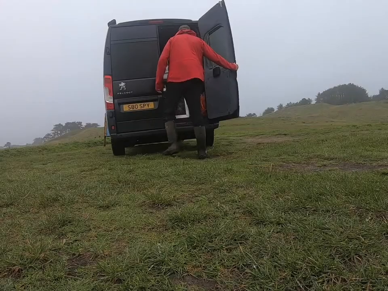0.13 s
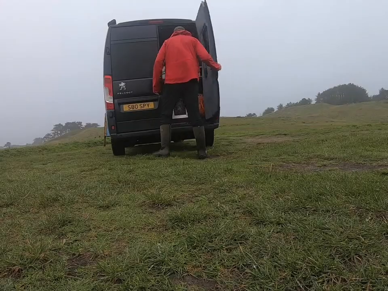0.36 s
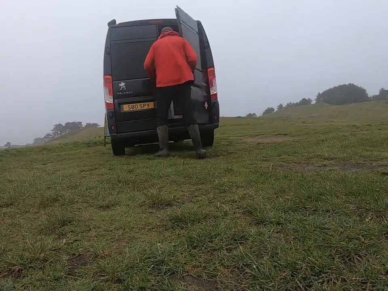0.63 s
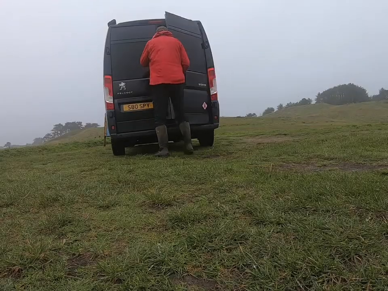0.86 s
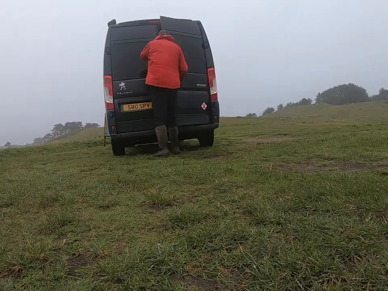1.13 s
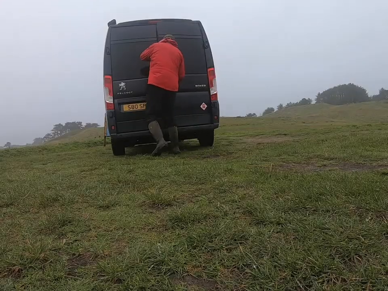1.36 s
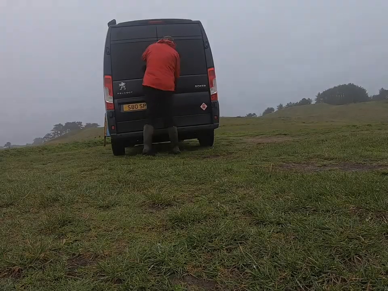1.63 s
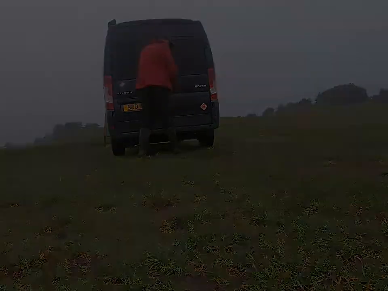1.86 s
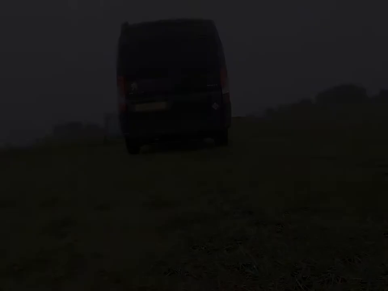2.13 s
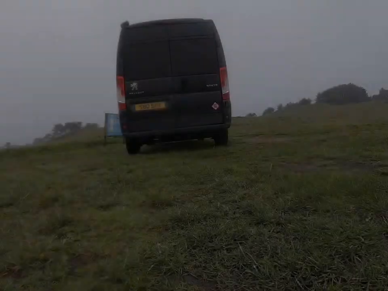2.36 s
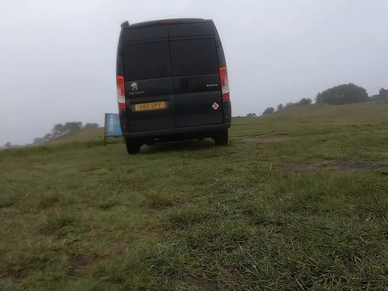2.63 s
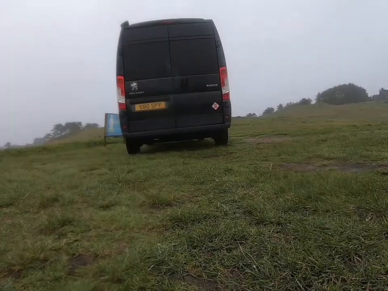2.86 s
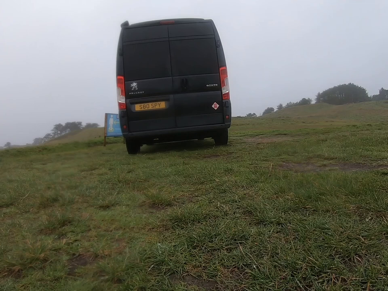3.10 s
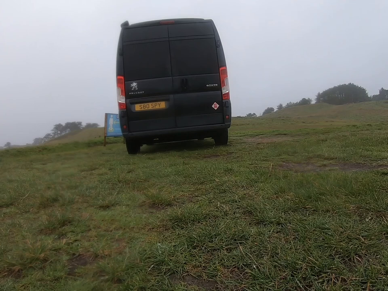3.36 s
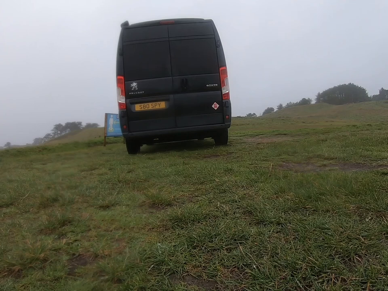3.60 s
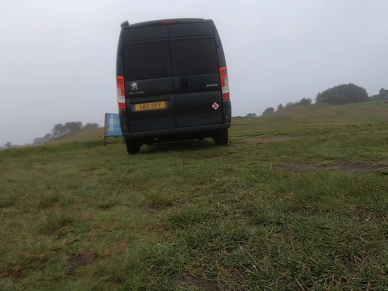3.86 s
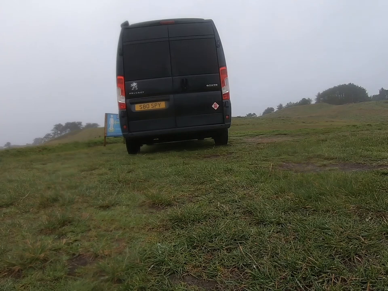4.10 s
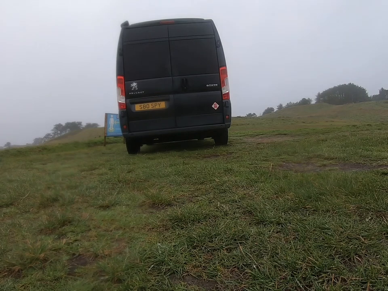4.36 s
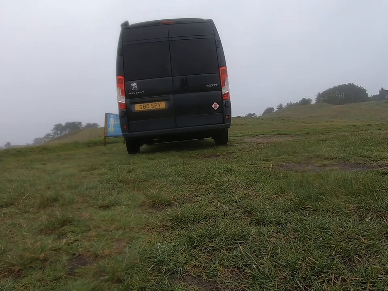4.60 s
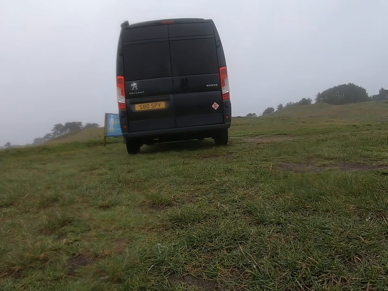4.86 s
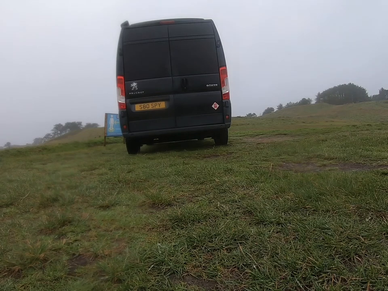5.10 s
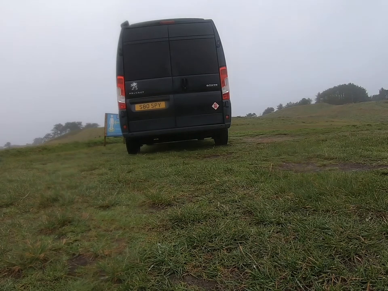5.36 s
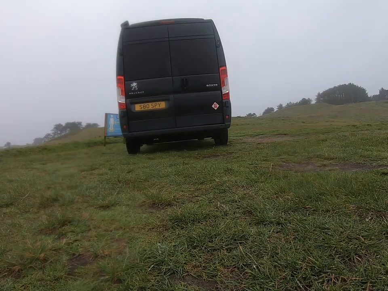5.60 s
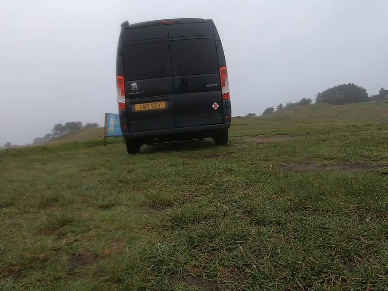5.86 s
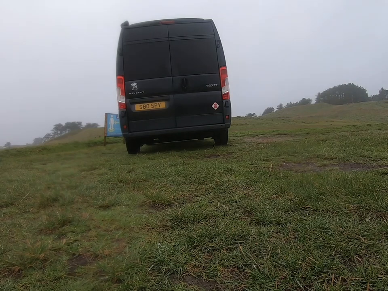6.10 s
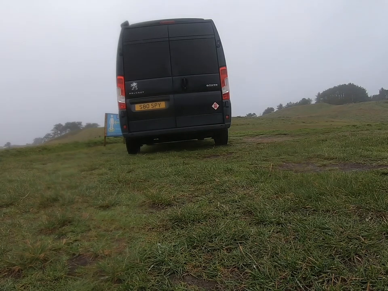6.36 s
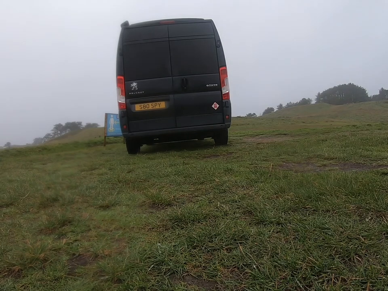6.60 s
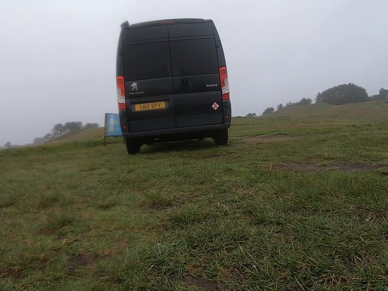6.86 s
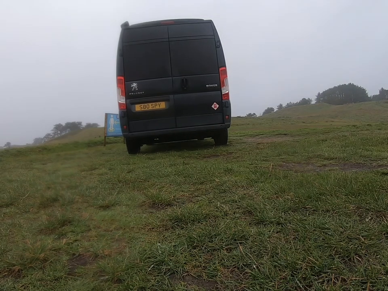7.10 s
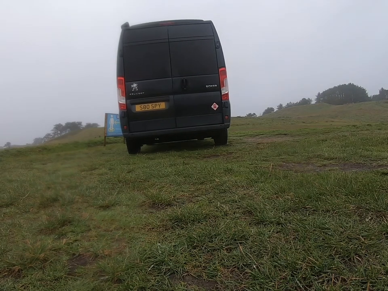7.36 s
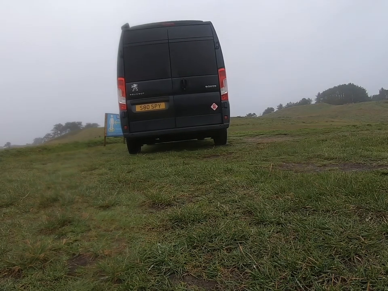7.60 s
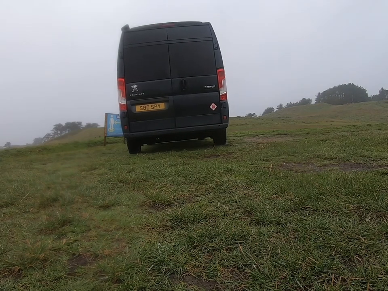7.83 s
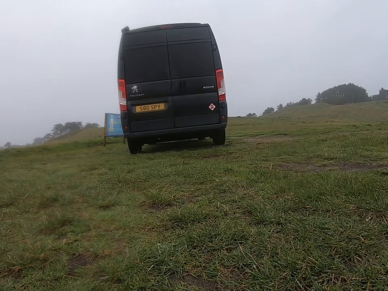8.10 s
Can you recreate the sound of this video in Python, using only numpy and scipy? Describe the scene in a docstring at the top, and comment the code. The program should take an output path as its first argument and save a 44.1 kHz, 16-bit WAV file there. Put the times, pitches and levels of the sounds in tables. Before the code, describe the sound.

A windy, open grassy hillside, heard by a stereo microphone a few metres behind a van. From 0 to 1.4 s there are soft wind puffs, faint cloth and boot rustles, a dull knock near 0.3 and a small click at 1.1. At 1.5 s the rear door slams: a rapid cluster of metallic cracks with a deep body boom, rattling out by about 1.75. Slight rustles follow, then near quiet until gusts grow from 2.9 s, thumping low and strongest around 3.5 to 5.1, a little heavier on the left. Tiny ticks come just before 3.8, when the starter grinds through two quick compressions. The diesel catches around 4.25, flares, and settles to a clattering idle with a short whining hum near 5 s. From 6.65 it revs, nearly doubling in pitch by 7.4, much louder and fuller, and holds steadily to the end at about 8 s.

```python
"""Diesel van on a windy hillside

Someone shuffles behind a van and slams its rear door; later the starter cranks two compressions and
the diesel catches, settles to idle and is revved up. Engine and exhaust follow one count of firings,
the starter is shaped noise with gliding tones, and the door is struck panel modes, cracks and a boom.
Cloth, knocks and drizzle are noise and short rings; gusts buffet two microphone ports over faint air.
"""
import sys
import numpy as np
from scipy import signal
from scipy.fft import irfft
from scipy.io import wavfile
from scipy.ndimage import uniform_filter1d

SR = 44100
rng = np.random.default_rng(int(sys.argv[2]) if len(sys.argv) > 2 else 0)


def level_to_linear(level):
    """Convert decibel levels to linear amplitude factors, elementwise."""
    exponent = np.asarray(level, float) / 20
    return 10 ** exponent


def materialize(psi):
    """Save the field psi as 16-bit PCM at rate SR to the path in sys.argv[1].

    A 1-D psi becomes a single channel; in a 2-D psi each row is a channel.
    """
    bounded = np.clip(np.atleast_2d(psi).T, -1, 1)
    quanta = np.round(bounded * 32767).astype(np.int16)
    wavfile.write(sys.argv[1], SR, quanta)


N = 362502  # length in samples


def evened(x):
    """Scales a signal to rms 1."""
    return x / np.sqrt(np.mean(x ** 2) + 1e-20)


def read(points, hz):
    """Reads a curve at the given frequencies, interpolating over log frequency."""
    f, value = np.transpose(points)
    return np.interp(np.log(hz + 1), np.log(f + 1), value)


def curves(rows):
    """Columns on the sample grid, and a gate that is open while the rows last."""
    s, *columns = np.transpose(rows)
    t = np.arange(N) / SR
    edge_s = np.minimum(t - s[0] + .008, s[-1] + .008 - t)
    gate = np.clip(edge_s * 125, 0, 1)
    return gate, *(np.interp(t, s, c) for c in columns)


def colour(x, points):
    """Filters by a spectrum, causally (minimum phase), so that a pulse rings after it strikes."""
    gain_db = np.maximum(read(points, abs(np.fft.fftfreq(16384, 1 / SR))), -100)
    response = np.exp(np.conj(signal.hilbert(np.log(level_to_linear(gain_db)))))
    taps = irfft(response[:8193])[:8192]
    return signal.oaconvolve(x, taps)[:N]


def noise(points):
    """Noise of rms 1 with the given spectrum."""
    return evened(colour(rng.standard_normal(N), points))


def wander(size):
    """Slow chance of rms 1, smooth over about size samples."""
    coarse = rng.standard_normal(N // 16 + 2)
    coarse = uniform_filter1d(uniform_filter1d(coarse, size // 16), size // 16)
    return np.interp(np.arange(N) / 16, np.arange(len(coarse)), evened(coarse))


def steady(x, size):
    """Evens out the slow level chance of a narrow noise."""
    power = uniform_filter1d(uniform_filter1d(x ** 2, size), size)
    return x / np.sqrt(power + .02)


def held(start, stop, attack_db_per_s, release_db_per_s):
    """dB shape: a straight rise, 0 from start to stop, a straight fall."""
    t = np.arange(N) / SR
    return -attack_db_per_s * np.maximum(start - t, 0) - release_db_per_s * np.maximum(t - stop, 0)


def ring(hz, t60, rise=0.00077546):
    """A decaying mode: a sine that falls 60 dB in t60 seconds after a straight rise in seconds."""
    t = np.arange(round(min(t60 * 0.8, 1) * SR) + 9) / SR
    return level_to_linear(-60 * t / t60) * np.sin(2 * np.pi * hz * t) * np.minimum(t / rise, 1)


def add(mix, s, sound):
    """Lays a sound into the mix, starting at s seconds."""
    part = mix[round(s * SR):][:len(sound)]
    part += sound[:len(part)]


# engine speed: t/s, firing rate f/Hz
ENGINE_SPEED = [(4.2, 24), (4.35, 33), (4.65, 29.2), (5.0, 27.4), (5.2, 26.6), (5.5, 25.6), (5.8, 25.2),
                (6.62, 25.2), (6.75, 29.3), (6.89, 32.9), (6.99, 34.9), (7.19, 43.6), (7.32, 47.1),
                (7.4, 48.6), (7.55, 49), (8.22, 49.4)]
# spectrum of the engine bay: f/Hz, level/dB
ENGINE_BAY = [(120, -17), (250, 2.5), (320, -19), (385, -8.5), (455, -14.5), (535, -10), (690, -13.5),
              (770, -7), (860, -15.5), (980, -19), (1140, -12), (1270, -6), (1390, -15), (1510, -6.5),
              (1640, -15), (1900, -11.5), (2600, -27.5), (3400, -60.5)]
# hiss of injectors and belts: f/Hz, level/dB
INJECTOR_HISS = [(1500, -13.5), (2400, -3.5), (4200, -8), (5300, -13.5), (6100, -10.5), (8000, -31.5),
                 (9800, -12), (11300, -30), (15000, -39)]
# generator hum partials: multiple of the firing rate, level/dB
GENERATOR_HUM = [(7.7, 2), (11.55, 2.5), (15.4, 3.5), (19.25, -6), (23.1, -7.5)]
IDLE_PER_S = 25.494  # firings a second at idle


def engine():
    """Four uneven cylinders puff through the exhaust and knock the block once per firing."""
    gate, rate = curves(ENGINE_SPEED)
    exhaust_db, clatter_db, hum_db = loads(rate)
    firings = np.cumsum(rate * (1 + .002 * wander(size=3000))) / SR
    firings += 400 - firings[round(5.93 * SR)]  # the first cylinder fires at this moment
    cylinder = firings.astype(int) % 4
    fired = np.diff(np.floor(firings), prepend=0.)

    cylinder_gain = level_to_linear(np.array([-6.0, -3.5, -3.0, -6.5])[cylinder])
    knock = 1 + 1.391 * np.exp(-(firings % 1) / 0.6006) * cylinder_gain
    rattle = knock * level_to_linear(1.17 * wander(size=150)) * rng.standard_normal(N)
    # valve gear repeats its taps at every firing
    taps = irfft(np.exp(2j * np.pi * rng.random(301)))
    valve_gear = np.interp(firings * 600, np.arange(600), taps, period=600)
    valve_taps = 0.7 * (rate / 49) ** 1.3 * evened(knock * valve_gear)
    clatter = evened(colour(evened(rattle) + valve_taps, ENGINE_BAY))
    clatter += level_to_linear(-22.5) * evened(colour(rattle, INJECTOR_HISS))

    hum = np.zeros(N)
    for multiple, db in GENERATOR_HUM:
        hum += level_to_linear(db + 3.5 * wander(size=2500)) * np.sin(2 * np.pi * multiple * firings)

    # loose panels, each rung by its own cylinders; the last only above idle speed
    loose = fired * level_to_linear(3.0 * wander(size=2000))
    revved = np.clip(rate / IDLE_PER_S - 1, 0, 1)
    panels = np.zeros(N)
    for struck, db, hz, t60, rise in [(cylinder == 0, -43, 529.43, 0.14892, 0.02831),
                                      (cylinder == 2, -46.5, 754.89, 0.1029, .02),
                                      (cylinder % 2 == 0, -43, 264.61, 0.14282, 0.01374),
                                      ((cylinder == 1) * revved, -34.5, 845, 0.07764, 0.0126)]:
        panels += level_to_linear(db) * signal.oaconvolve(loose * struck, ring(hz, t60, rise))[:N]

    out = level_to_linear(exhaust_db) * exhaust(rate, firings) + level_to_linear(clatter_db) * clatter
    return gate * (out + level_to_linear(hum_db) * hum + panels)


# response of the exhaust pipe: f/Hz, level/dB
EXHAUST_PIPE = [(20, 0.5), (49, -0.5), (97, -7), (146, -16), (197, -3), (246, -8), (296, -23.5),
                (345, -25.5), (440, -32), (540, -21), (640, -40.5), (850, -25.5), (1100, -41.5)]


def exhaust(rate, firings):
    """Firing orders add up to one suction dip per firing; uneven cylinders give weak half orders."""
    out = np.zeros(N)
    at = np.arange(round(ENGINE_SPEED[0][0] * SR), N)
    frames = np.arange(0, N, 512)
    for k in np.arange(1, 20, .5):
        drift, sway = uniform_filter1d(rng.standard_normal((2, len(frames))), 6) * np.sqrt(6)
        level = level_to_linear(read(EXHAUST_PIPE, k * rate[frames]) - 29.534 * (k % 1) + 1.0 * sway)
        phase = 2 * np.pi * k * firings[at] + 0.0385 * k * np.interp(at, frames, drift)
        phase -= 0.077041 * k ** 2  # spreads the dip in time
        out[at] -= np.interp(at, frames, level) * np.cos(phase)
    return out


CATCH_S, THROTTLE_S = 4.3, 6.72  # the engine has swelled in; pedal down
# at idle, growth with speed, change under throttle, swell as the engine catches
EXHAUST_DB, EXHAUST_DB_PER_OCTAVE, EXHAUST_LOAD_DB, EXHAUST_CATCH_DB_PER_S = -52, 19, 1, 200
CLATTER_DB, CLATTER_DB_PER_OCTAVE, CLATTER_LOAD_DB, CLATTER_CATCH_DB_PER_S = -52.5, 10, 4, 67.5
HUM_DB, HUM_FIRING_HZ, HUM_DB_PER_HZ = -53.5, 27.088, 4.5  # loudest at one speed
# charging sets in; the battery is topped up and the hum dies away
CHARGE_S, CHARGED_S, HUM_FADE_DB_PER_S = 4.78, 5.3, 9


def loads(rate):
    """Exhaust, clatter and hum levels in dB from speed and throttle."""
    octaves = np.log2(rate / IDLE_PER_S)
    pedal = np.clip((np.arange(N) / SR - THROTTLE_S) / 0.07574, 0, 1)
    exhaust_db = EXHAUST_DB + EXHAUST_DB_PER_OCTAVE * octaves + EXHAUST_LOAD_DB * pedal
    exhaust_db += held(CATCH_S, 9, EXHAUST_CATCH_DB_PER_S, 0)
    clatter_db = CLATTER_DB + CLATTER_DB_PER_OCTAVE * octaves + CLATTER_LOAD_DB * pedal
    clatter_db += held(CATCH_S, 9, CLATTER_CATCH_DB_PER_S, 0)
    hum_db = HUM_DB - HUM_DB_PER_HZ * abs(rate - HUM_FIRING_HZ)
    hum_db += held(CHARGE_S, CHARGED_S, 70, HUM_FADE_DB_PER_S)
    return exhaust_db, clatter_db, hum_db


# spectra of the pinion grind and of the hiss over it: f/Hz, level/dB
GRIND_SPECTRUM = [(210, -33.5), (350, -11.5), (548, -14), (739, -10.5), (1020, -9.5), (1700, -5.5),
                  (1890, -17.5), (2040, -12), (4500, -43), (9900, -120)]
FIZZ_SPECTRUM = [(1760, -29), (3000, 1.5), (5730, -1.5), (7910, -11.5), (8640, -4), (9810, 2),
                 (11800, -16.5), (13800, -16), (15000, -24.5)]
# gear whine, a rising and falling glide, then a falling one:
# start t/s, stop t/s, top speed t/s, top mesh f/Hz, level/dB
GEAR_WHINE = [(3.9, 4.072, 4.0, 499, -48), (4.148, 4.192, 4.135, 564.4, -50.5)]
# relative heights of the mesh harmonics, from the fundamental up
MESH_HARMONICS = [0.3866, 2.4, 2.0577, .6, .35]
# tones as the engine catches, a thin rising whistle and a rotor coasting down: t/s, f/Hz, level/dB
COASTING_TONES = [
    [(4.21, 4500, -73.5), (4.26, 5095, -74.5), (4.33, 5654, -82)],
    [(4.38, 418.4, -58.5), (4.47, 385.4, -45), (4.6, 343.2, -55.5), (4.75, 318.1, -65)],
]
MESH_SAG_HZ_PER_S2, WHINE_DB_PER_HZ, WHINE_EDGE_DB_PER_S = 10500, 0.1495, 1100


def starter():
    """Pinion grind and hiss load up on each compression, with gliding tones."""
    grind, hiss = efforts()
    out = grind * level_to_linear(2.0 * wander(size=120)) * noise(GRIND_SPECTRUM)
    out += hiss * level_to_linear(1.748 * wander(size=300)) * noise(FIZZ_SPECTRUM)
    for start, stop, top_s, top_hz, top_db in GEAR_WHINE:
        at = slice(round((start - .1) * SR), round((stop + .1) * SR))
        t = np.arange(N)[at] / SR
        hz = np.maximum(top_hz - MESH_SAG_HZ_PER_S2 * (t - top_s) ** 2, 0)
        db = top_db - WHINE_DB_PER_HZ * (top_hz - hz)
        db += held(start, stop, WHINE_EDGE_DB_PER_S, WHINE_EDGE_DB_PER_S)[at]
        phase = 2 * np.pi * np.cumsum(hz * (1 + 0.01514 * wander(size=300)[at])) / SR
        for k, share in enumerate(MESH_HARMONICS, 1):
            out[at] += share * level_to_linear(db + 2.5 * wander(size=800)[at]) * np.sin(k * phase)
    for gate, hz, db in map(curves, COASTING_TONES):
        out += gate * level_to_linear(db + 1.98 * wander(size=1500)) * np.sin(2 * np.pi * np.cumsum(hz) / SR)
    return out


# starter efforts: pinion engages, first compression, second compression, overrun:
# start t/s, length t/s, grinding level/dB, hiss level/dB, swell over the effort level/dB
STARTER_EFFORTS = [(3.836, 0.08432, -40, -62, -8.5), (3.941, 0.11645, -51, -71.5, 9),
                   (4.146, 0.04075, -42.5, -66.5, -1), (4.253, 0.20647, -58, -68, 3.5)]
EFFORT_ATTACK_DB_PER_S, EFFORT_RELEASE_DB_PER_S = 2499, 517
SPIN_S, SPIN_STOP_S, SPIN_DB, SPIN_HISS_DB = 3.82, 4.5437, -61, -73  # the armature spins under the efforts


def efforts():
    """Grinding and hiss levels: the steady spin plus each effort."""
    t = np.arange(N) / SR
    spin_db = held(SPIN_S, SPIN_STOP_S, EFFORT_ATTACK_DB_PER_S, 110)
    grind, hiss = level_to_linear(SPIN_DB + spin_db), level_to_linear(SPIN_HISS_DB + spin_db)
    for s, length, db, hiss_db, swell_db in STARTER_EFFORTS:
        shape_db = swell_db * np.clip((t - s) / length, 0, 1)
        shape_db += held(s, s + length, EFFORT_ATTACK_DB_PER_S, EFFORT_RELEASE_DB_PER_S)
        grind = grind + level_to_linear(db + shape_db)
        hiss = hiss + level_to_linear(hiss_db + shape_db)
    return grind, hiss


# door blows of seal, latch, frame and rebounds: t/s, level/dB, sharpness as crack over blow level/dB
DOOR_BLOWS = [(1.503, -21, -14), (1.518, -16, -9), (1.528, -19.5, -7.5), (1.537, -23.5, -8.5),
              (1.547, -25, -13), (1.571, -21.5, -10.5), (1.584, -25.5, -13.5), (1.600, -22, -6),
              (1.612, -30.5, -13), (1.63, -36.5, -19.5), (1.647, -31, -17.5), (1.696, -36.5, -15),
              (1.727, -40, -17.5)]
# modes of door and body: f/Hz, level/dB, t60 t/s
PANEL_MODES = [(53.013, 7, 0.5922), (88.334, 7, .4), (159.14, 6, 0.3093), (225, -1, .25),
               (333.43, -7, 0.25), (486.28, -11, 0.15), (602.89, -8, 0.12), (749, -14.5, .15),
               (1290, -18.5, .1), (1900, -27, .1), (2765.2, -24.5, .1), (3211, -27.5, 0.11)]
# spectrum of the cracks: f/Hz, level/dB
CRACK_SPECTRUM = [(200, -19.5), (330, -1.5), (610, -9), (1300, -20.5), (3050, -18.5), (8000, -41),
                  (10100, -39), (12000, -63), (14500, -75)]
SLAM_S, SLAM_DB = 1.5195, -21.5  # the frame is struck
# air squeezed in the load bay shakes the body; it rises from 20 dB below the peak in BOOM_RISE_S
BOOM_S, BOOM_DB, BOOM_RISE_S, BOOM_HELD_S, BOOM_FALL_DB_PER_S = 1.53, -15, .025, 0.036, 124.5


def door():
    """Blows ring the panels and throw out cracks; the body booms under the squeezed air."""
    drive, crack, tail = np.zeros(N), np.zeros(N), np.zeros(N)
    t = np.arange(9000) / SR
    for s, db, sharp_db in DOOR_BLOWS:
        thud = uniform_filter1d(rng.standard_normal(300), size=5) * level_to_linear(-60 * t[:300] / 0.011)
        add(drive, s, level_to_linear(db) * thud)
        add(crack, s, level_to_linear(db + sharp_db) * level_to_linear(-60 * t / .022) * np.minimum(t / .0006, 1))
        add(tail, s, level_to_linear(db + sharp_db - 10 - 60 * t / .15))

    high, low = np.zeros(SR), np.zeros(SR)
    for hz, mode_db, t60 in PANEL_MODES:
        add(low if hz < 370 else high, 0, level_to_linear(mode_db) * ring(hz, t60))
    slam = np.zeros(N)
    add(slam, SLAM_S, level_to_linear(SLAM_DB) * low)
    panels = level_to_linear(-18.0) * signal.oaconvolve(drive, high)[:N]

    early = np.maximum(BOOM_S - np.arange(N) / SR, 0) / BOOM_RISE_S
    boom = level_to_linear(BOOM_DB - 20 * early ** 2 + held(0, BOOM_S + BOOM_HELD_S, 0, BOOM_FALL_DB_PER_S))
    shake = signal.oaconvolve(rng.standard_normal(N), low[:1500])[:N]
    shake = steady(evened(shake), size=900)

    # sheet metal shivers after each crack
    shiver = signal.lfilter(*signal.butter(1, 4500, fs=SR), noise(CRACK_SPECTRUM))
    shiver *= level_to_linear(2.5 * wander(size=200))
    cracks = level_to_linear(8.5) * (crack * noise(CRACK_SPECTRUM) + tail * shiver)
    return slam + boom * shake + panels + cracks


# small knocks and ticks: t/s, level/dB, ring f/Hz
SMALL_KNOCKS = [(.153, -45.5, 899.1), (.281, -28.5, 285.6), (.297, -43, 701.3), (.65, -46.5, 1258),
                (1.13, -37, 2557), (1.407, -52, 1490), (1.449, -33, 218.4), (1.479, -34.5, 598.2),
                (1.806, -53.5, 1194), (1.88, -50, 1562), (3.1, -53, 899.6), (3.711, -50, 889),
                (3.754, -53, 1000), (3.808, -43.5, 1256)]


def knocks():
    """Each a ring of a few cycles with a puff of noise no brighter than the ring allows."""
    out = np.zeros(N)
    for s, db, hz in SMALL_KNOCKS:
        puff = rng.standard_normal(3000) * level_to_linear(-60 * np.arange(3000) / SR / (20 / hz + .015))
        lowpass = signal.butter(3, min(1.5397 * hz, 9000), fs=SR)
        add(out, s, level_to_linear(db - 2.5) * ring(hz, 8 / hz + .01))
        add(out, s, level_to_linear(db + 2.0) * signal.lfilter(*lowpass, puff))
    return out


# cloth and boots in grass, each stroke swelling and cut short: peak t/s, level/dB, swell t/s, fade t/s
# (swell and fade reach 8.3 dB below the peak)
RUSTLE_STROKES = [(.29, -72.5, 0.0589, 0.08326), (.66, -74.5, 0.2094, 0.0248), (.8, -71.5, 0.1317, 0.1048),
                  (1.095, -62.5, 0.03334, 0.0439), (1.132, -49.5, 0.014103, 0.009822),
                  (1.34, -77, 0.653, 0.03687), (1.49, -63, 0.11358, 0.0682),
                  (1.73, -64.5, 0.05435, 0.01942), (1.84, -71, 0.04746, 0.02374),
                  (1.9, -68.5, 0.04475, 0.06428), (2.35, -73, .04, 0.04), (2.425, -76, .02, .03),
                  (3.56, -77.5, 0.1421, 0.0677)]
# spectrum of the swish: f/Hz, level/dB
CLOTH_SPECTRUM = [(350, -34.5), (600, -14.5), (1160, -10), (2820, -9.5), (7800, -34), (9750, -32),
                  (15000, -62)]


def rustle():
    """A soft swish of noise, dense with fine crackles."""
    t = np.arange(0, N, 32) / SR
    level = np.zeros(len(t))
    for s, db, swell, fade in RUSTLE_STROKES:
        level += level_to_linear(db - 8.3 * np.maximum((s - t) / swell, (t - s) / fade) ** 2)
    level = np.interp(np.arange(N) / SR, t, level)
    grains = (rng.random(N) < 2500 / SR) * level_to_linear(3.0 * np.minimum(rng.exponential(1, N), 3))
    grains = grains * rng.standard_normal(N)
    swish = evened(colour(rng.standard_normal(N) + 0.64 * evened(grains), CLOTH_SPECTRUM))
    return level * level_to_linear(2.2 * wander(size=250)) * swish


DRIPS_PER_S, DRIP_DB = 35, -27  # drizzle blown on the housing, level against the gust


def drizzle():
    """Tiny dry ticks whose level follows the gusts up to a ceiling."""
    size = (rng.random(N) < DRIPS_PER_S / SR) * level_to_linear(4 * np.minimum(rng.exponential(1, N), 3))
    tick = rng.standard_normal(60) * level_to_linear(-np.arange(60) * 1.5)
    tick = signal.lfilter(*signal.butter(4, 9500, fs=SR), tick)
    return level_to_linear(DRIP_DB) * signal.oaconvolve(size * np.minimum(gusts(), .02), tick)[:N]


# spectra of the slow buffeting and of the faster flutter: f/Hz, level/dB
BUFFET_SPECTRUM = [(12, 2.5), (30, 2.5), (50, 12.5), (90, 1), (130, -3.5), (200, -26.5), (400, -69),
                   (2000, -100)]
FLUTTER_SPECTRUM = [(60, -64), (130, 1.5), (180, 2), (260, -7.5), (400, -18.5), (800, -65.5), (2500, -95)]


def wind():
    """Pressure eddies, partly private to each port and stronger on the left, with a faster flutter."""
    low = gusts()
    high = low * level_to_linear(-15.5)
    eddies = []
    for _ in range(2):
        buffet = low * steady(noise(BUFFET_SPECTRUM), size=1500)
        flutter = high * noise(FLUTTER_SPECTRUM) * level_to_linear(4.672 * wander(size=500))
        eddies.append(buffet + flutter)
    a, b = eddies
    return np.array([level_to_linear(2.2) * (.9 * a + .4 * b), level_to_linear(-2.2) * (.9 * a - .4 * b)])


# gusts on the microphone ports: start t/s, held t/s, level/dB, fall by 20 dB t/s
WIND_GUSTS = [(.055, 0.01301, -37, 0.1273), (.3, 0.05968, -40, 0.1223), (.46, 0.12496, -46.5, 0.0317),
              (.71, 0.02466, -37, 0.1632), (.83, 0.0589, -41.5, 0.5619), (1.03, 0.03547, -41, 0.1886),
              (1.15, 0.03267, -44, 0.0545), (1.32, 0.1857, -46, 0.221), (1.97, 0.1654, -49, 0.1865),
              (2.06, .02, -42, 0.0015), (2.6, 0.01446, -46, 0.2044), (2.88, 0.1077, -41.5, 0.3196),
              (3.01, 0.01826, -34, 0.0723), (3.14, 0.1247, -35.5, 0.0429), (3.47, 0.09975, -27, 0.1642),
              (3.68, 0.05753, -34.5, 0.2292), (3.75, 0.01223, -30, 0.0536), (3.86, 0.05215, -39, 0.2352),
              (4.025, 0.017874, -28, 0.0048), (4.11, 0.1446, -32.5, 0.2152), (4.29, 0.01629, -25, 0.1124),
              (4.39, 0.07298, -29, 0.1764), (4.61, 0.1616, -29.5, 0.129), (4.9, 0.0974, -39.5, 0.1628),
              (5.03, 0.04574, -31, 0.0871), (5.085, 0.02238, -24, 0.0881), (5.21, 0.0498, -35, 0.0812),
              (5.61, 0.01733, -35.5, 0.0241), (5.89, 0.2414, -39, 0.1812), (6.16, 0.1794, -34.5, 0.0765),
              (6.42, 0.0332, -35.5, 0.2867), (6.52, 0.0996, -45.5, 0.6081)]
GUST_RISE_DB_PER_S, LULL_DB = 379.5, -72


def gusts():
    """Pressure level at the ports: the gusts add up in power over the lull."""
    t = np.arange(0, N, 64)[:, None] / SR
    s, length, db, fall = np.transpose(WIND_GUSTS)
    rise_db = -GUST_RISE_DB_PER_S * np.maximum(s - t, 0)
    fall_db = -20 * np.maximum(t - s - length, 0) / fall
    power = level_to_linear(LULL_DB) ** 2 + (level_to_linear(db + rise_db + fall_db) ** 2).sum(1)
    return np.interp(np.arange(N) / SR, t[:, 0], np.sqrt(power))


# spectrum of the open air: f/Hz, level/dB
AIR_SPECTRUM = [(59, -41.5), (100, -10.5), (172, -2.5), (383, -12), (492, -17), (831, -20), (983, -29),
                (1660, -29.5), (2990, -40), (9660, -53), (15000, -76)]


def open_air():
    """A faint bed of shaped noise whose level wanders slowly."""
    return level_to_linear(-60) * noise(AIR_SPECTRUM) * level_to_linear(0.5 * wander(size=6000))


# likeness of the two ports: f/Hz, likeness (1 = identical)
PORT_LIKENESS = [(60, .99), (300, .99), (640, .88), (1400, .88), (3100, .92), (7000, .6), (15000, .7)]
# balance of the two ports: f/Hz, left over right level/dB
PORT_BALANCE = [(60, 0), (300, 0), (700, 2.5), (1400, 2.5), (4400, 1), (8000, -1.5)]


def ports(x):
    """Two ports hear one sound with own colour, plus scattered ground reflections that differ."""
    taps = rng.standard_normal(1500) * level_to_linear(-60 * np.arange(1500) / SR / 0.068)
    scattered = signal.oaconvolve(x, taps / np.linalg.norm(taps))[:N]
    difference = [(hz, 10 * np.log10((1.002 - min(c, 1)) / 2)) for hz, c in PORT_LIKENESS]
    scattered = colour(scattered, difference)
    sides = []
    for sign in (1, -1):
        sides.append(colour(x + sign * scattered, [(hz, sign * db / 2) for hz, db in PORT_BALANCE]))
    return np.array(sides)


def scene():
    """Van, footwork, drizzle and air reach both ports; wind and a second air differ between them."""
    near = engine() + starter() + door() + knocks() + rustle() + drizzle() + open_air()
    return ports(near) + wind() + 0.7693 * open_air() * np.array([[1], [-1]])


def low_pass(x):
    """Removes everything above the highest recorded frequency."""
    return signal.sosfilt(signal.butter(12, 15710, fs=SR, output="sos"), x)


def record(dry):
    """A steep lowpass ends the band near 15 kHz."""
    finished = signal.oaconvolve(dry, signal.firwin(301, 15200, fs=SR)[None], "same")
    return low_pass(finished)


dry = scene()
out = record(dry)
materialize(out)
```